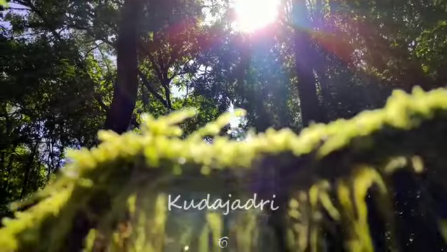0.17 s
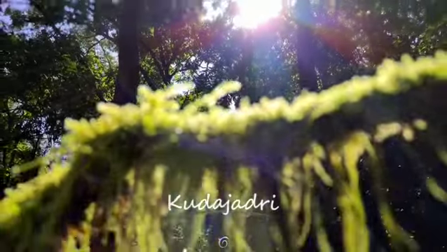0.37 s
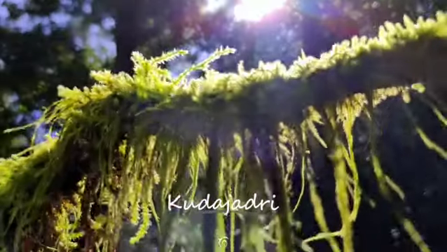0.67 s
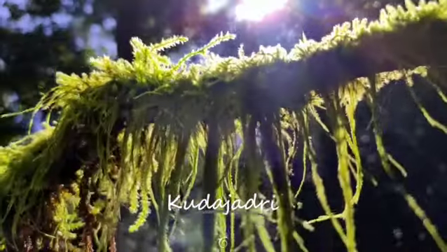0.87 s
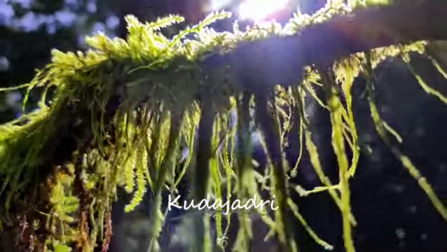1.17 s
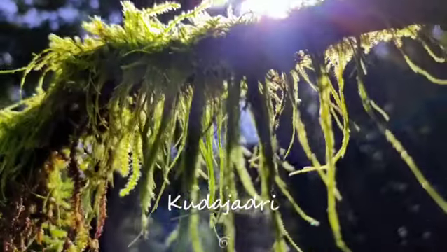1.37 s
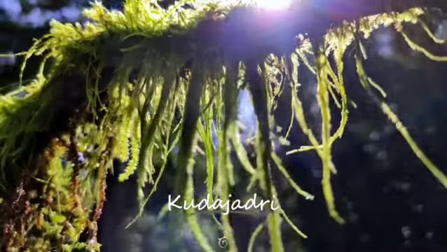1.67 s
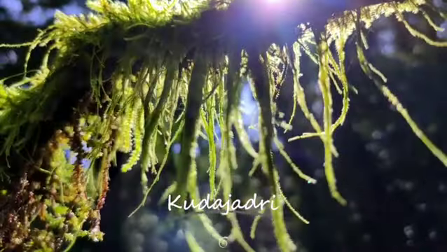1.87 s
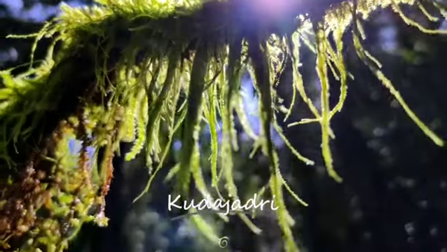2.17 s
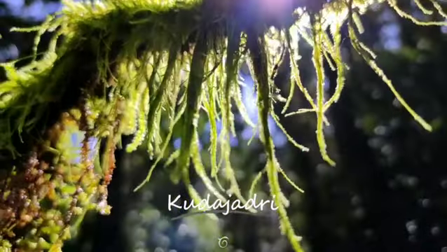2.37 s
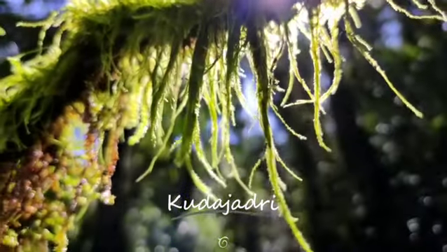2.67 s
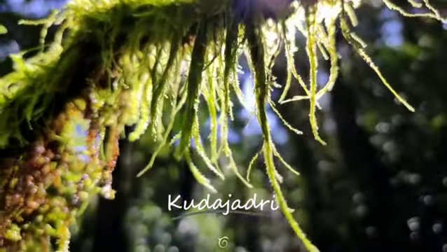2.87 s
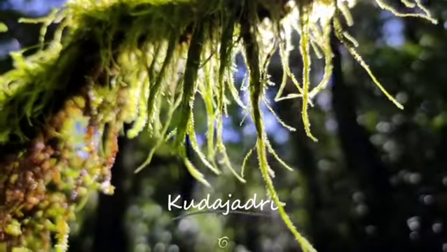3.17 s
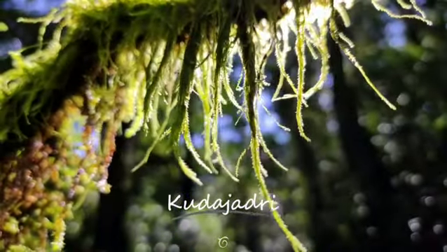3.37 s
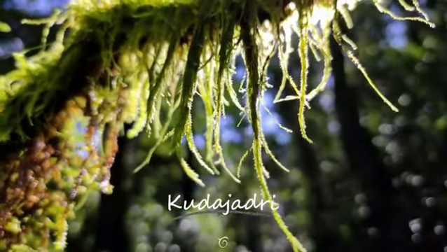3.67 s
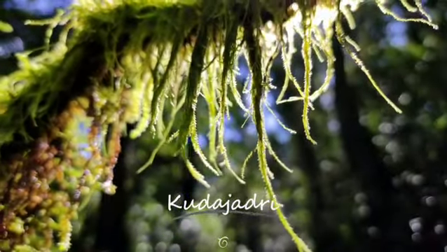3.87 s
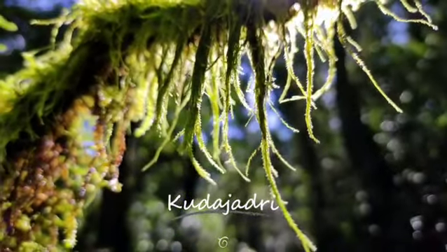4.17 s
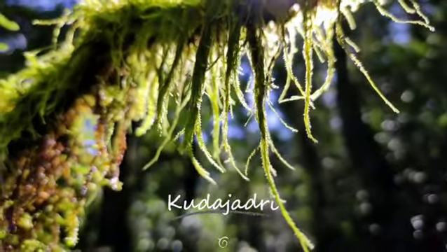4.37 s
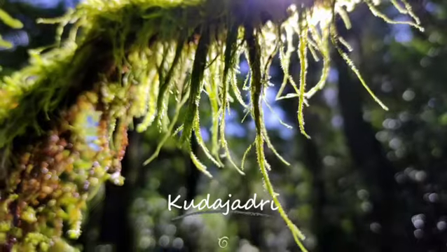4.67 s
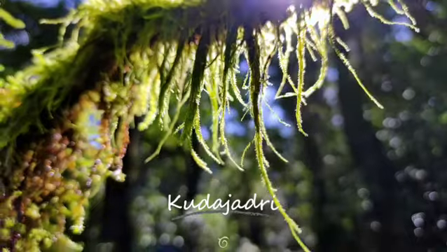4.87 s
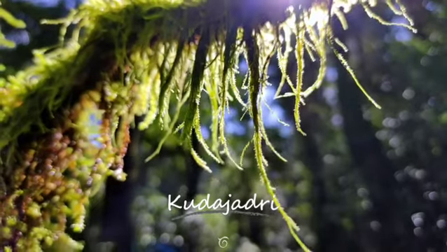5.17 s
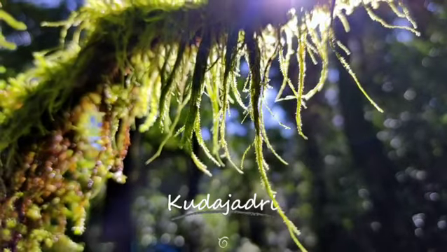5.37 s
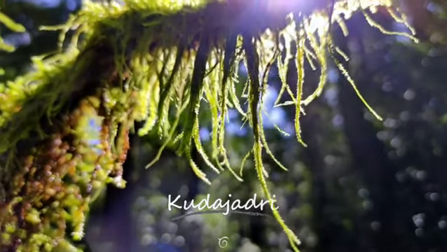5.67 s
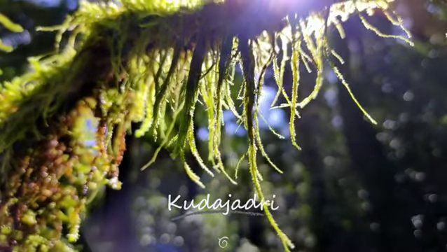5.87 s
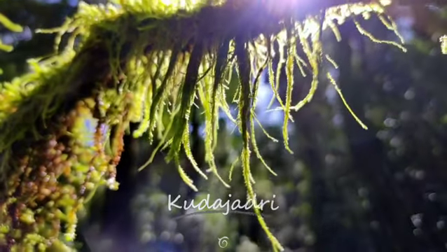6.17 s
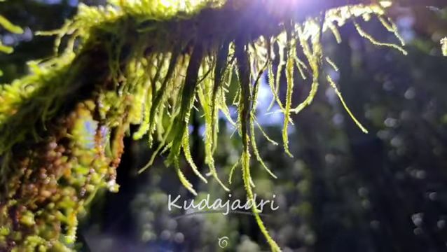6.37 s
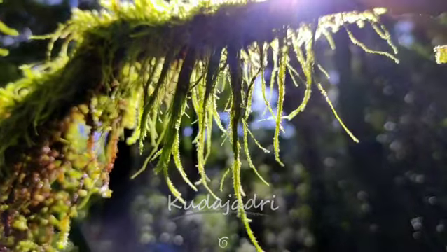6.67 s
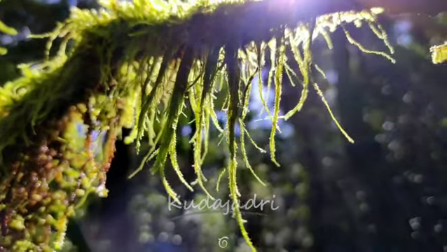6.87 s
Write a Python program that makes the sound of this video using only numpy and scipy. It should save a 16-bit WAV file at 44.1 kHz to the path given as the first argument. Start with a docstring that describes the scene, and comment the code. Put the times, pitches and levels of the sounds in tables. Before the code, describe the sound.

A bird whistles, buzzes and later warbles in a forest while insects chirp in pulsing runs over a strong, low, swelling engine-like drone.

```python
"""Forest with bird and insects

A bird whistles, buzzes and warbles (pitch-curve sines with tremor); a farther one rattles.
A near insect chirps in swelling runs of falling pulses; others answer, blurred by echoes.
A low drone, like a distant engine, swells and fades over a deeper hum (slow-wandering sines).
Shaped noise makes the soft wash of air and leaves, the buffeting and two small late knocks.
"""
import sys
import numpy as np
from scipy import signal
from scipy.fft import rfft, irfft
from scipy.io import wavfile
from scipy.ndimage import uniform_filter1d

SR = 44100
rng = np.random.default_rng(int(sys.argv[2]) if len(sys.argv) > 2 else 0)


def to_wav(sig):
    """Store sig (one row per channel, or 1-D mono) as 16-bit WAV at the path in sys.argv[1].

    Samples outside -1..1 are clipped; the rate is SR.
    """
    pcm = np.clip(np.atleast_2d(sig), -1, 1) * 32767
    pcm = np.round(pcm).astype(np.int16)
    wavfile.write(sys.argv[1], SR, pcm.T)  # frames by channels


N = 310023
TIME = np.arange(N) / SR


def amp(db):
    """Decibels to gain."""
    return 10 ** (np.asarray(db) / 20)


def evened(x):
    """Scales to rms 1."""
    return x / np.sqrt(np.mean(x ** 2) + 1e-20)


def read(points, hz):
    """Reads a spectrum table on a log-frequency axis."""
    f, value = np.transpose(points)
    return np.interp(np.log(hz + 1), np.log(np.maximum(f, 0) + 1), value)


def follow(rows, t):
    """Reads every column of a curve at the times t."""
    s, *columns = np.transpose(rows)
    return [np.interp(t, s, c) for c in columns]


def add(mix, s, sound):
    """Lays a sound into the mix from time s."""
    part = mix[max(round(s * SR), 0):][:len(sound)]
    part += sound[:len(part)]


def wander(per_s):
    """Smooth random curve of rms 1: noise low-passed at about per_s Hz."""
    f = np.fft.rfftfreq(N, 1 / SR)
    lowpass = np.exp(-(f / per_s) ** 2) * (f > 0)
    return evened(irfft(rfft(rng.standard_normal(N)) * lowpass, N))


def place(x, left_db, lead_ms):
    """Sets direction: left is left_db louder and lead_ms earlier than right; negative reverses."""
    f = np.fft.rfftfreq(N, 1 / SR)
    late = irfft(rfft(x) * np.exp(-2j * np.pi * f * lead_ms / 1000), N)
    return np.array([x * amp(left_db / 2), late * amp(-left_db / 2)])


def forest(x):
    """Scattered echoes from trunks and leaves, different at left and right."""
    # echo decay: hz, t60_s
    trees = [(500, 0.44), (2000, 0.53), (5000, 0.39), (12000, 0.067)]
    taps = rng.standard_normal((2, SR)) * (rng.random((2, SR)) < 2000 / SR)  # 2000 echoes/s
    taps[:, :SR // 200] = 0  # none in the first 5 ms
    hz, t, z = signal.stft(taps, SR, nperseg=256)
    decay = amp(-60 * t / read(trees, hz)[:, None])
    tail = signal.istft(z * decay, SR, nperseg=256)[1]
    return signal.fftconvolve(x[None], tail / np.linalg.norm(tail[0]), axes=1)[:, :N]


def note(start, length, hz, db, glide, settle_s, attack_s, onset_db, fade_db):
    """One bird note as rows (s, Hz, dB): starts a share `glide` off pitch and onset_db off level."""
    t = np.linspace(0, length, 50)
    pitch = hz * (1 + glide * np.exp(-t / settle_s))
    level = db + onset_db * np.maximum(1 - t / attack_s, 0) + fade_db * (t / length) ** 2
    return np.column_stack([start + t, pitch, level])


def sing(notes, gain_db, trill_hz, trills_per_s, rough, uneven_db, left_db, lead_ms, wet_db):
    """A whistle on its pitch curve; a quick tremor of the syrinx makes it trill or buzz."""
    pitch, level = np.full(N, float(notes[0][0][1])), np.zeros(N)
    for rows in notes:
        hz, db = follow(rows, TIME)
        edge_s = np.minimum(TIME - rows[0][0], rows[-1][0] - TIME)
        gate = np.clip(edge_s / 0.00805 + 1, 0, 1)
        pitch = np.where(gate > 0, hz, pitch)
        level += amp(db + gain_db) * np.sin(np.pi / 2 * gate) ** 2
    tremor_hz = trills_per_s * (1 + 0.1534 * wander(23.8))
    tremor = np.sin(2 * np.pi * np.cumsum(tremor_hz) / SR)
    pitch = pitch * (1 + rough * wander(245)) + trill_hz * tremor
    level = level * amp(uneven_db * wander(45))  # the note swells unevenly
    voice = np.sqrt(2) * level * np.sin(2 * np.pi * np.cumsum(pitch) / SR)
    return place(voice, left_db, lead_ms) + amp(wet_db) * forest(voice)


def birds(cry_hz=1942, low_cry_hz=990, break_s=.01):
    """A falling and a rising whistle, a buzz, a pip, four warbles, two cries that break downward."""
    # all levels are before gain_db
    # falling whistle, scooping up into its first tone: time_s, pitch_hz, level_db
    falling_curve = [(.028, 1420, -45.5), (.05, 1710, -31), (.09, 1656, -29), (.152, 1650, -30),
                     (.173, 1610, -40.5), (.205, 1462, -33), (.24, 1445, -44)]
    # rising whistle: time_s, pitch_hz, level_db
    rising_curve = [(0.335, 1654, -33), (0.35, 1730, -35.5), (0.41, 1998, -29.5), (0.455, 2260, -32),
                    (0.49, 2407, -28.5), (0.545, 2483, -30.5), (0.58, 2580, -30.5)]
    # hoarse buzz: start_s, length_s, pitch_hz, level_db
    buzz_rows = [(0.71, 0.2, 2090, -28.5)]
    # lone pip: start_s, length_s, pitch_hz, level_db
    pip_rows = [(4.746, 0.037, 3064, -28.5)]
    # warbles: start_s, length_s, pitch_hz, level_db
    warble_rows = [(5.043, .135, 1486, -41.5), (5.316, 0.18, 1560, -32), (5.631, 0.144, 1555, -30.5),
                   (5.935, 0.13, 1506, -31.5)]
    # cries: start_s, high_s, low_s, first_pitch_offset_share, level_db, high_change_db, low_level_db
    cry_rows = [(6.213, .135, .075, -.02, -32.5, 2, -34.5), (6.617, .12, 0.122, 0.079, -28.5, -4, -37)]

    buzzes = [note(*row, glide=-0.0295, settle_s=0.075, attack_s=0.024, onset_db=-1, fade_db=-12)
              for row in buzz_rows]
    pips = [note(*row, glide=-.01, settle_s=0.016, attack_s=.016, onset_db=-6, fade_db=-6)
            for row in pip_rows]
    warbles = [note(*row, glide=.035, settle_s=0.0916, attack_s=.02, onset_db=-3.5, fade_db=-1)
               for row in warble_rows]
    cries, drops = [], []
    for s, high_s, low_s, glide, db, change_db, low_db in cry_rows:
        cries.append(note(s, high_s, cry_hz, db, glide,
                          settle_s=.014, attack_s=.015, onset_db=1.5, fade_db=change_db))
        drops.append(note(s + high_s + break_s, low_s, low_cry_hz, low_db, glide=.32,
                          settle_s=.017, attack_s=.02, onset_db=3, fade_db=-2))
    return (sing([falling_curve], gain_db=4, trill_hz=8.3, trills_per_s=37, rough=.003,
                 uneven_db=2, left_db=-9.0, lead_ms=0.2, wet_db=-10.5)
            + sing([rising_curve], gain_db=1.5, trill_hz=25, trills_per_s=64, rough=0.0097,
                   uneven_db=2.4, left_db=2.5, lead_ms=0.11, wet_db=-8.0)
            + sing(buzzes, gain_db=-1.5, trill_hz=203, trills_per_s=51, rough=0.042,
                   uneven_db=-1.5, left_db=0.0, lead_ms=0.16, wet_db=-4.5)
            + sing(pips, gain_db=0.5, trill_hz=9.2, trills_per_s=36, rough=0.0058,
                   uneven_db=2, left_db=-4.5, lead_ms=0.0307, wet_db=-11.5)
            + sing(warbles, gain_db=2.7, trill_hz=54.7, trills_per_s=27, rough=0.012,
                   uneven_db=2.5, left_db=3.0, lead_ms=0.18, wet_db=-9.0)
            + sing(cries, gain_db=2, trill_hz=84, trills_per_s=36, rough=0.02,
                   uneven_db=3.5, left_db=-1.5, lead_ms=0.15, wet_db=-9.5)
            + sing(drops, gain_db=-1, trill_hz=28, trills_per_s=45, rough=0.025,
                   uneven_db=1.9, left_db=-2, lead_ms=.22, wet_db=-12))


def stroke(hz, fall_hz, half_s, skirt_db, rasp, octave_db=-29):
    """One wing stroke: the scraper slows along the file, so the tone falls as the pulse swells and dies."""
    t = np.arange(-SR // 40, SR // 40) / SR
    detune, stretch = rng.standard_normal(2)
    slip = evened(uniform_filter1d(rng.standard_normal(len(t)), size=60))  # uneven teeth
    pitch = hz * (1 + .006 * detune + rasp * slip) - fall_hz * np.tanh(t / 0.0153)
    core = np.exp(-(t / half_s / np.exp(0.15 * stretch)) ** 2)
    skirt = np.exp(-((t - .003) / .013) ** 2)  # wider and later than the core
    shape = core + amp(skirt_db) * skirt
    angle = 2 * np.pi * (np.cumsum(pitch) / SR + rng.random())
    tone = np.sin(angle) + amp(octave_db) * np.sin(2 * angle)
    return np.sqrt(2) * shape / shape.max() * tone


def near_insect(full_db=-28.0, wet_db=-14, full_hz=4978, hz_per_db=22, stroke_s=.0545, warm_up_s=0.0467):
    """Runs of strokes from the right, growing louder and higher; leaves throw back a late echo of each."""
    # runs: first_stroke_s, last_stroke_s, first_stroke_re_full_db
    near_runs = [(.302, .523, -9), (1.223, 1.548, -13.5), (1.834, 2.105, -13.5), (2.436, 2.654, -10.5),
                 (3.452, 3.612, -11.5), (4.431, 4.755, -10.5), (5.033, 5.249, -12.5), (6.009, 6.226, -18),
                 (6.468, 6.79, -10)]
    out, bounced = np.zeros(N), np.zeros(N)
    for first, last, soft_db in near_runs:
        for s in np.linspace(first, last, round((last - first) / stroke_s) + 1):
            effort_db = soft_db * np.exp(-(s - first) / warm_up_s)
            pulse = amp(full_db + effort_db) * stroke(
                hz=full_hz + hz_per_db * effort_db, fall_hz=655, half_s=0.0026, skirt_db=-4.5, rasp=0.02)
            start = s - len(pulse) / SR / 2
            add(out, start, pulse)
            delay_s = rng.uniform(.005, .025)
            add(bounced, start + delay_s, pulse * amp(rng.uniform(-26, -15)))
    direct = place(out, left_db=-10.5, lead_ms=0.054)
    return direct + place(bounced, left_db=-28.5, lead_ms=0) + amp(wet_db) * forest(out)


def far_insects(direct_db=-2, wet_db=-3):
    """Similar strokes from deeper in the wood, without the swell, blurred by echoes."""
    # runs: start_s, end_s, pitch_hz, level_db (before the gains below)
    far_runs = [(0.115, .56, 4760, -41.5), (0.661, .95, 4670, -40.5), (0.98, 1.07, 5530, -46),
                (1.127, 1.6, 4610, -42.5), (1.854, 2.17, 4810, -45), (2.699, 3.12, 4730, -39.5),
                (3.352, 3.68, 4610, -40), (3.871, 4.14, 4630, -39.5), (4.381, 4.78, 4910, -42.5),
                (5.265, 5.74, 4760, -39.5), (5.967, 6.25, 4706, -42), (6.546, 6.85, 4830, -40)]
    out = np.zeros(N)
    for start, end, hz, db in far_runs:
        for s in np.arange(start, end, .056):
            level = amp(db - 2.0 + 1.2 * rng.standard_normal())
            pulse = level * stroke(hz=hz, fall_hz=305.0, half_s=0.011, skirt_db=-14.5, rasp=0.02)
            add(out, s - len(pulse) / SR / 2, pulse)
    return amp(direct_db) * place(out, left_db=-5.5, lead_ms=0.048) + amp(wet_db) * forest(out)


def rattle(top_hz=2380, bottom_hz=1890, wet_db=-2.0):
    """A distant bird repeats one short falling note, slowing a little as it goes."""
    # level curve: time_s, level_db (before a 4 dB cut and chance)
    rattle_curve = [(3.4, -43), (3.9, -40), (4.5, -36.5), (5, -35), (5.6, -36), (6.2, -37.5)]
    k = np.arange(37)
    times = 3.4875 + .0722 * k + .00006 * k ** 2
    pitch = np.linspace(top_hz, bottom_hz, SR // 36)
    envelope = np.sqrt(2) * np.hanning(len(pitch))
    out = np.zeros(N)
    for s, db in zip(times, *follow(rattle_curve, times)):
        turns = np.cumsum(pitch * (1 + 0.019 * rng.standard_normal())) / SR
        level = amp(db - 4 + 2 * rng.standard_normal())
        add(out, s - len(envelope) / SR / 2, level * envelope * np.sin(2 * np.pi * turns))
    return place(out, left_db=4, lead_ms=0.08) + amp(wet_db) * forest(out)


def drone(flutter_db=1.0, sway_db=-1.5, waver_db=3.5):
    """A low sine that sags in pitch, swells and fades, with two faint wavering overtones."""
    # pitch: time_s, pitch_hz
    pitch_curve = [(0.0, 104), (0.13, 100.1), (1.92, 100.2), (2.48, 97.84), (4.57, 95.15), (6.25, 95.84),
                   (6.95, 92.9)]
    # swells and fades: time_s, level_db
    level_curve = [(0.0, -10), (0.13, -11), (0.39, -16), (1.12, -17), (1.62, -23), (1.74, -37),
                   (1.82, -25.5), (1.86, -37), (1.95, -22.5), (2.46, -16), (3.21, -18.5), (3.33, -31),
                   (3.89, -22.5), (4.01, -14), (5.65, -16.5), (6.29, -34), (6.64, -24.5), (6.95, -18.5)]
    # drift between the channels: time_s, left_re_right_db
    side_curve = [(0.0, 1.5), (1.14, -5.5), (1.68, 2.0), (3.68, -7.5), (3.85, 0.5), (4.68, -5.5),
                  (5.3, -0.5), (5.9, -3.5), (6.1, 6.5), (6.95, -3.5)]
    # overtones: multiple, peak_level_db, peak_s, fall_away_db_per_s
    harmonics = [(2, -45, 7.1, 1), (3, -48, 3.9, 6.5)]
    (hz,), (db,), (left_db,) = [follow(c, TIME) for c in (pitch_curve, level_curve, side_curve)]
    angle = 2 * np.pi * np.cumsum(hz) / SR
    tone = amp(db + flutter_db * wander(10)) * np.sin(angle)
    out = place(tone, left_db + sway_db * wander(18), lead_ms=-1.13)
    for multiple, top_db, top_s, fall_db_per_s in harmonics:
        level = amp(top_db - fall_db_per_s * np.abs(TIME - top_s) + waver_db * wander(2.4))
        out = out + level * np.sin(multiple * angle + 0.84 * wander(4.1))
    return np.sqrt(2) * out


def undertone(waver_db=2.0):
    """A wavering hum below the drone; late on its pitch rises and its level drops."""
    hz = 53.45 + 6.43 * np.clip((TIME - 5.5) / 0.69, 0, 1)
    db = -30 - 18 * np.maximum(TIME - 5.7, 0) + waver_db * wander(4.4)
    hum = np.sqrt(2) * amp(db) * np.sin(2 * np.pi * np.cumsum(hz) / SR)
    return place(hum, left_db=4.5, lead_ms=2.2)


def air(spectrum, patchy_db):
    """Noise with drifting patches in time and frequency, partly alike at left and right."""
    # likeness of the channels: hz, correlation
    alike = [(60, 0.78), (130, 0.35), (280, 0.21), (590, 0.6), (1270, 0.39), (2730, 0), (5850, 0.0086),
             (12600, 0.041)]
    # balance: hz, left_re_right_db
    balance = [(60, -13.5), (110, 7.5), (200, 1), (360, -0.5), (650, 4), (1170, 2.5), (2120, 4), (3830, 2),
               (6940, 2), (12600, 0.5)]
    frames, hz = N // 512 + 6, np.fft.rfftfreq(2048, 1 / SR)
    a, b, c, d, patches = rng.standard_normal((5, frames, len(hz)))
    patches = uniform_filter1d(patches, size=6, axis=0)
    patches = evened(uniform_filter1d(patches, size=16, axis=1))
    same, left = np.clip(read(alike, hz), -1, 1), a + 1j * b
    right = same * left + np.sqrt(1 - same ** 2) * (c + 1j * d)
    lean = amp(read(balance, hz) / 2)
    z = np.array([left * lean, right / lean])
    z *= amp(read(spectrum, hz) + patchy_db * patches)
    return signal.istft(z.transpose(0, 2, 1), nperseg=2048, noverlap=1536)[1][:, :N]


def wash(body_db=-34.5, treble_db=-44.0, split_hz=3000, swell_db=0.98,
         turn_down_at_s=5.39, body_down_db_per_s=3.5, hiss_down_db_per_s=3):
    """Air and the finer hiss of leaves, gently swelling; the noise level is turned down towards the end."""
    # noise colour before each band is scaled: hz, density_db_per_hz
    wash_spectrum = [(76, -41), (130, -8), (152, -10), (191, -9), (250, -14.5), (541, -18), (1100, -18),
                     (2780, -21), (3570, -22.5), (4420, -21.5), (5790, -30), (9930, -38.5), (11600, -43),
                     (13000, -49.5)]
    swell, down_s = swell_db * wander(0.68), np.maximum(TIME - turn_down_at_s, 0)
    noise = air(wash_spectrum, patchy_db=1.17)
    low = signal.sosfiltfilt(signal.butter(2, split_hz, fs=SR, output="sos"), noise)
    body = amp(body_db + swell - body_down_db_per_s * down_s) * evened(low)
    hiss = amp(treble_db + swell - hiss_down_db_per_s * down_s) * evened(noise - low)
    return body + hiss


def buffet(level_db=-23):
    """Slow eddies press on the microphone: low noise, partly alike at left and right."""
    # noise colour before scaling: hz, density_db_per_hz
    buffet_spectrum = [(1, -15), (5, 10.5), (11, 11.5), (22, -12.5), (40, -24), (80, -7), (130, -21),
                       (250, -59), (1000, -100)]
    shared, *own = rng.standard_normal((3, N))
    colour = amp(read(buffet_spectrum, np.fft.rfftfreq(N, 1 / SR)))
    rumble = irfft(rfft(shared + 2.5 * np.array(own)) * colour, N)
    return amp(level_db + 2.45 * wander(1.3)) * evened(rumble)


def knocks():
    """Small knocks close to the microphone: band-shaped noise with a sudden start, dying exponentially."""
    # knocks: start_s, level_db, centre_hz, width_octaves, t60_s
    knock_rows = [(6.881, -50, 4983, 0.89, 0.034), (6.926, -38, 473, 0.36, 0.41)]
    out, hz = np.zeros((2, N)), np.fft.rfftfreq(N, 1 / SR)
    for s, db, centre, octaves, t60 in knock_rows:
        band = np.exp(-(np.log2((hz + 1) / centre) / octaves) ** 2)
        burst = evened(irfft(rfft(rng.standard_normal(N)) * band, N))
        out += burst * (TIME >= s) * amp(db - 60 * np.abs(TIME - s) / t60)
    return out


def scene():
    """Everything in the wood."""
    return (birds() + near_insect() + far_insects() + rattle() + drone() + undertone()
            + wash() + buffet() + knocks())


def record(dry, end_s=6.969, edge_hz=13000):
    """The sound stops just before the end over 3 ms; then a low-pass limits the band."""
    gated = dry * np.clip((end_s - TIME) / .003, 0, 1)
    lowpass = signal.firwin(511, edge_hz, window=("kaiser", 9), fs=SR)
    return signal.oaconvolve(gated, lowpass[None], "same")


dry = scene()
out = record(dry)
to_wav(out)
```